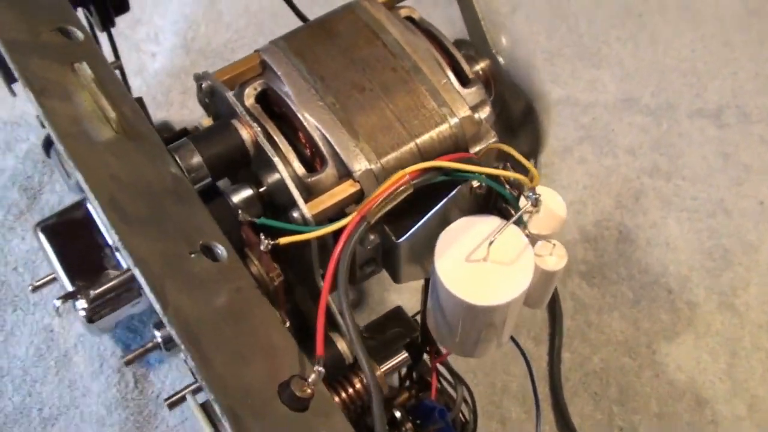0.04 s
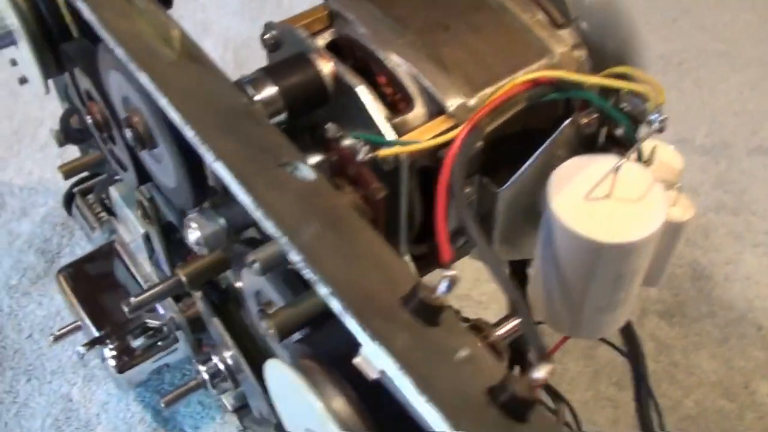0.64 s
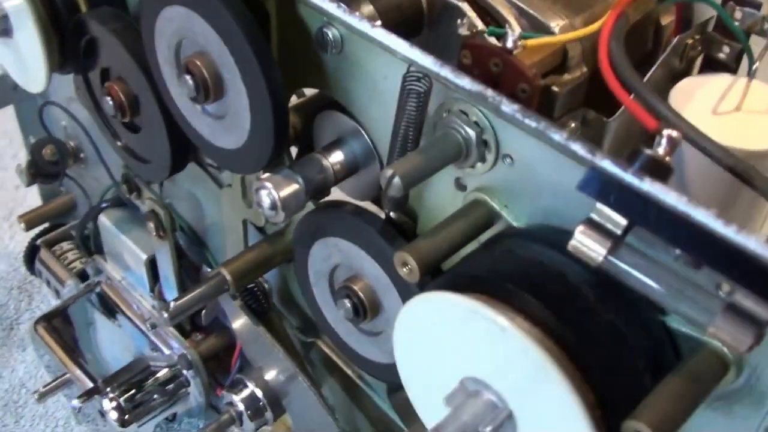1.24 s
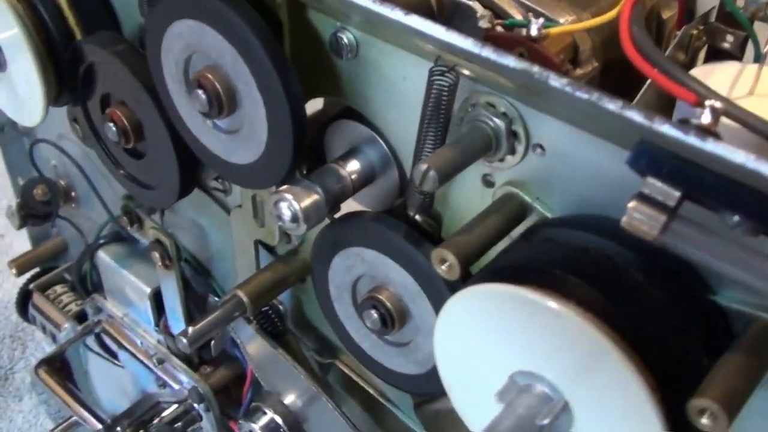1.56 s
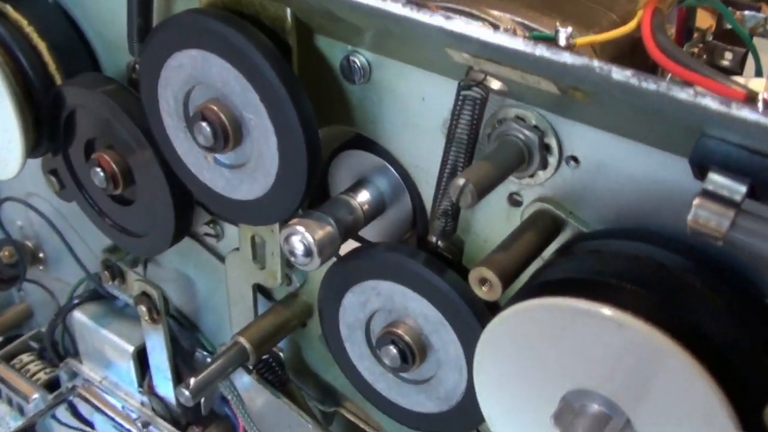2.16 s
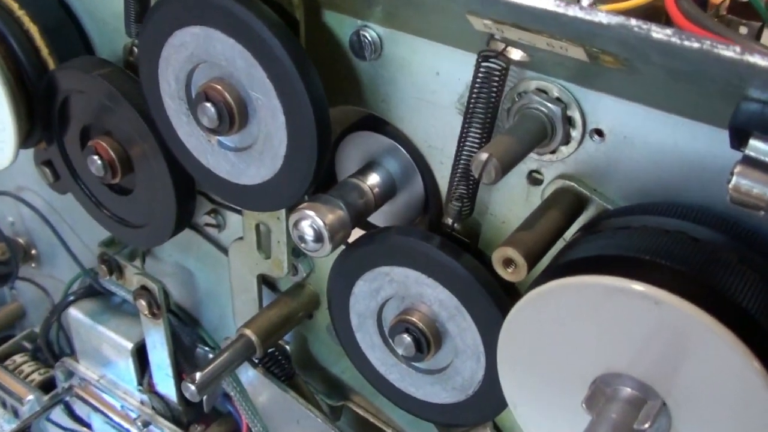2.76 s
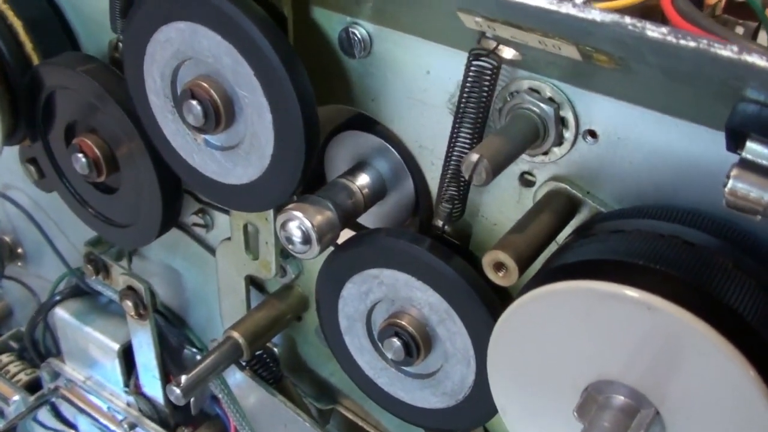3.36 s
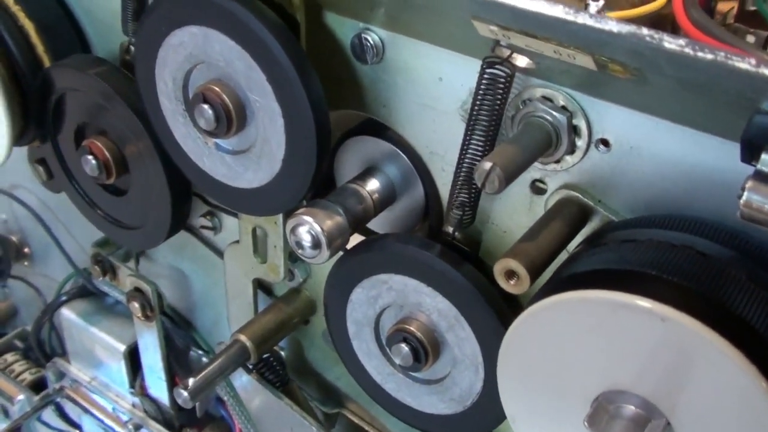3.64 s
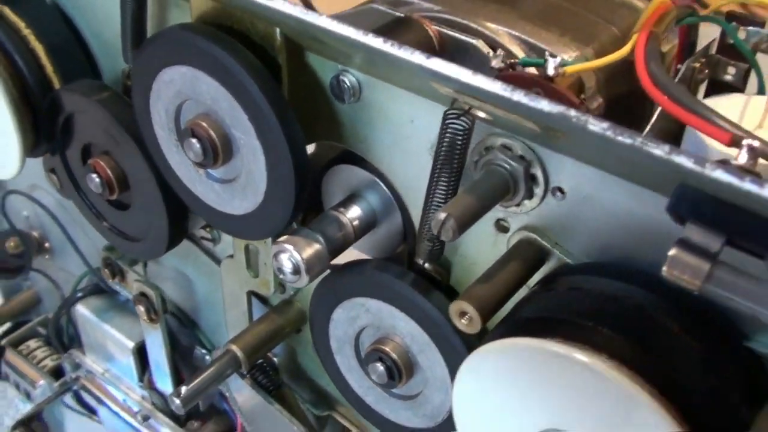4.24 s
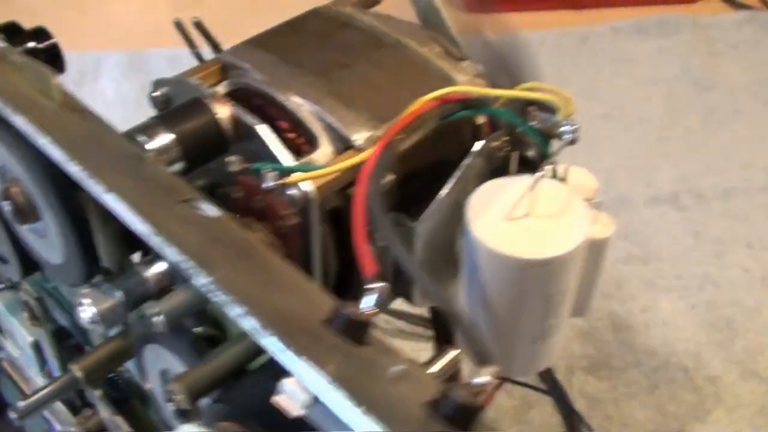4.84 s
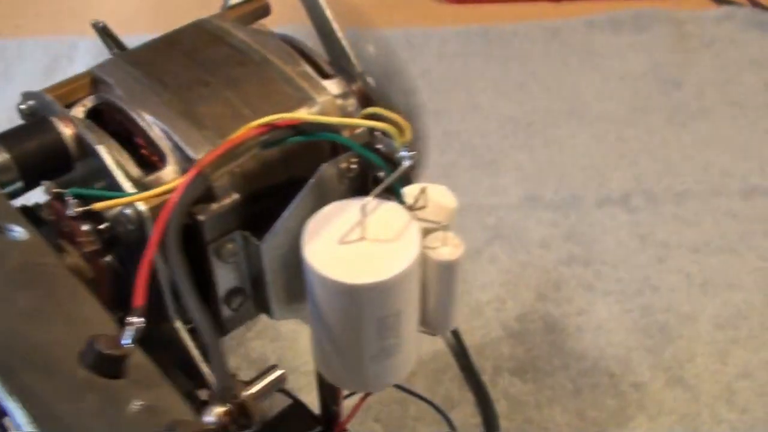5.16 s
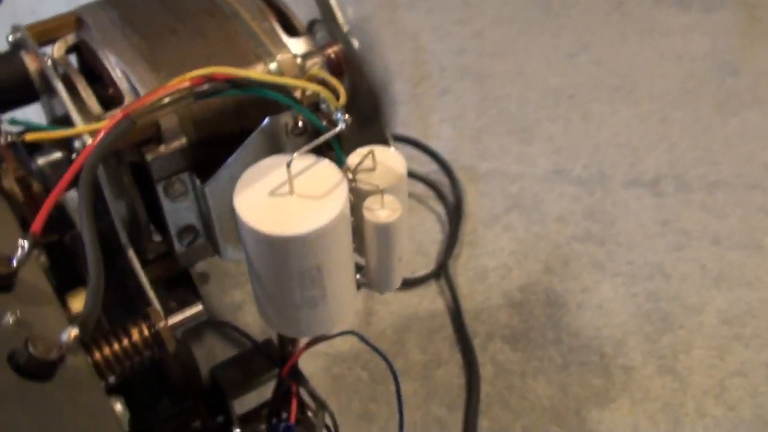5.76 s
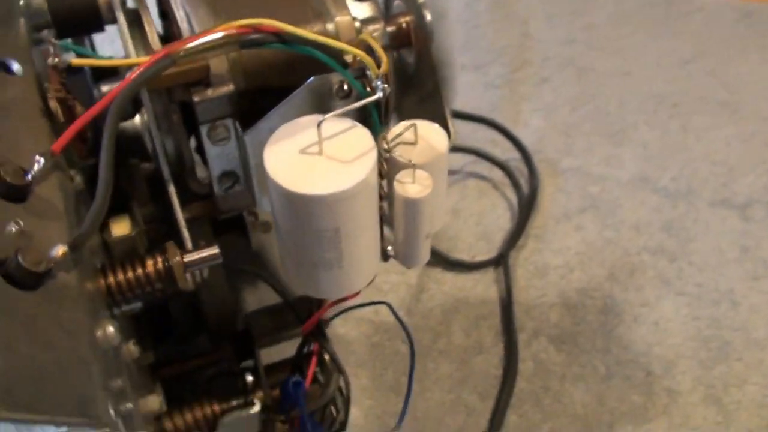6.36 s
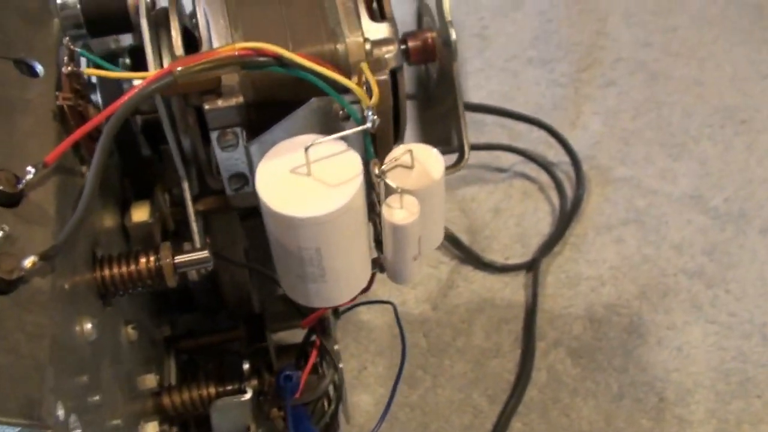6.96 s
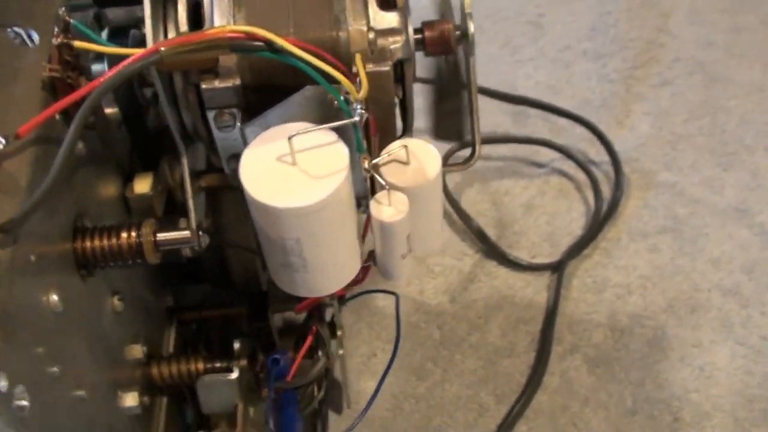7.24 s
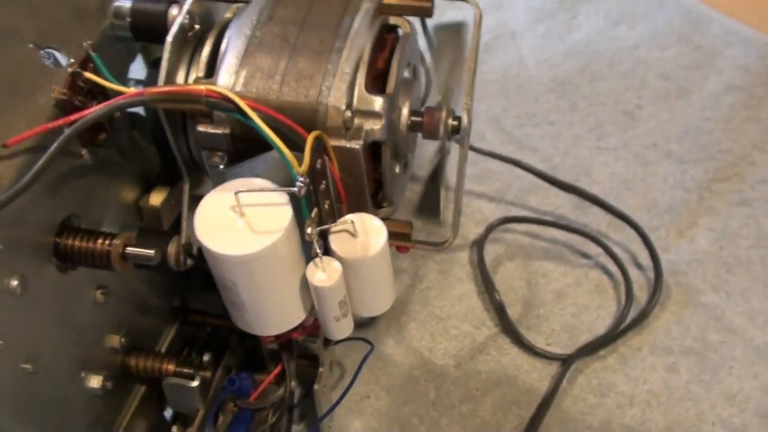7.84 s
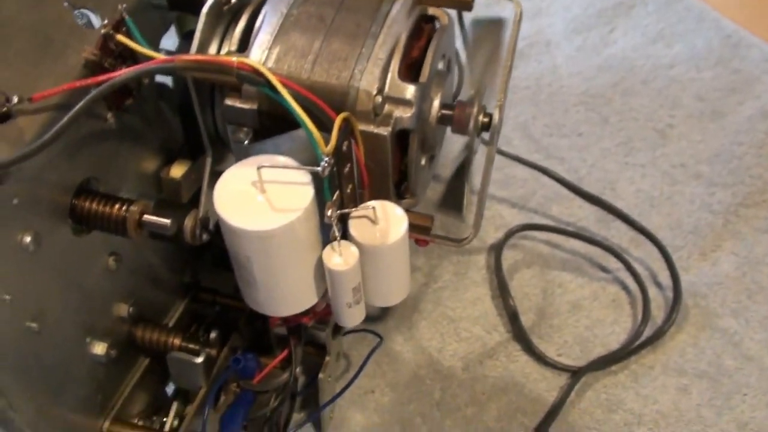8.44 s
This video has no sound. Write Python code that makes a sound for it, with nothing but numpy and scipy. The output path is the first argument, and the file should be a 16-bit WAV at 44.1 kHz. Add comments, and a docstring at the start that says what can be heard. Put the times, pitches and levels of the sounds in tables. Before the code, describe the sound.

A small electric motor hums steadily with a slight throb and soft hiss, with one light knock and a few faint ticks.

```python
"""An opened tape deck runs on a workbench under a hand-held camera. From the start its induction motor
hums at twice the mains rate and throbs with the wheels, over a rush of fan and rubber rims, hiss and thin
whines; all swell and settle. Near 1 s the camera's case is knocked in the hand; sparse ticks fall in the
first 6 s. From 2 to 4 s the camera is over the wheels, where the chassis shades the hiss. Cloth, faint
at first, rustles most from 6 s on."""
import sys
import numpy as np
from scipy import signal
from scipy.fft import rfft, irfft, next_fast_len
from scipy.io import wavfile

SR = 44100
rng = np.random.default_rng(int(sys.argv[2]) if len(sys.argv) > 2 else 0)


def put_to_file(sound):
    """Save the sound as 16-bit audio at rate SR, in the file named by the first command-line argument."""
    columns = np.atleast_2d(sound).T  # one column per channel
    safe = np.clip(columns, -1, 1)
    whole_steps = np.round(safe * 32767)
    wavfile.write(sys.argv[1], SR, whole_steps.astype(np.int16))


N = 383229
TIME_S = np.arange(N) / SR
RING_TIME_S = np.arange(SR // 4) / SR


# Hum overtones. Each row: multiple of the hum, level in dB re the hum, left minus right in dB.
HUM_OVERTONES = [(2, -36.5, 11), (3, -38, 0), (6, -45, -8.5), (8, -49.5, -1), (12, -54, 2),
                 (24, -54.5, -15)]
# Swell as the camera moves. Each row: time in seconds, gain of harmonic 2 in dB, of harmonic 3 in dB.
HARMONIC_SWELL = [(0, -6.5, 1), (1.55, 3.5, -8), (2.25, -2, 2), (3.05, 6, 0), (4.1, 1, -1), (4.9, 2.5, 3.5),
                  (6.2, 5.5, 6), (6.6, -5, 0), (7, 4, 3), (7.8, -17, 4), (8.4, 0, 2)]

def motor_hum(hum_hz=119.963, wheel_hz=5.9875, first_throb_s=0.017, pan_settle_s=3.2, waver=0.14):
    """The stator iron hums; the wheels load it once and twice a turn, shaking level and phase."""
    wheel_rad = 2 * np.pi * wheel_hz * (TIME_S - first_throb_s)
    hum_rad = 2 * np.pi * hum_hz * TIME_S + 0.065 * np.sin(2 * wheel_rad) - 0.069 * np.sin(wheel_rad)
    load = 1 + 0.053 * np.cos(2 * wheel_rad) + 0.017 * np.cos(wheel_rad)
    out = np.sin(hum_rad) * pan(-3.5 + 3 * np.exp(-TIME_S / pan_settle_s))  # drifts to the right
    times_s, second_db, third_db = np.transpose(HARMONIC_SWELL)
    swell_db = {2: np.interp(TIME_S, times_s, second_db), 3: np.interp(TIME_S, times_s, third_db)}
    for multiple, db, pan_db in HUM_OVERTONES:
        # overtones waver as the camera moves through their pattern in the room
        tone = np.sin(multiple * hum_rad + waver * drift(0.39) + rng.uniform(0, 2 * np.pi))
        tone *= 1 + waver * drift(0.96)
        out += amp(db + swell_db.get(multiple, 0)) * pan(pan_db) * tone
    return np.sqrt(2) * amp(running_db(base_db=-28.5, swell_db=9, over_wheels_db=1)) * load * out


# Rush spectrum. Each row: frequency in Hz, relative density in dB.
RUSH_SPECTRUM = [(20, -12), (42, -18), (66, -5.5), (95, -2.5), (170, 0.5), (330, -1), (550, -3.5),
                 (900, -8), (1500, -14), (2300, -19.5), (5000, -27), (15000, -35.5)]

def fan_and_rims(flutter_db=0.7):
    """Fan draught and rolling rubber rims make a soft, low rush."""
    rush = stereo_noise(RUSH_SPECTRUM)
    return rush * amp(running_db(base_db=-44, swell_db=12, over_wheels_db=-0.33) + flutter_db * drift(29))


# Case modes. Each row: frequency in Hz, relative level in dB, free t60 in seconds,
# left minus right in dB, polarity of right against left.
CASE_MODES = [(323, -4.5, 0.071, -2, 1), (593, -17, 0.024, 4, -1), (750, 3.5, 0.016, 4, -1),
              (945, -5, 0.021, 10, 1), (1230, -7.5, 0.042, 12, 1), (1454, -9, 0.034, -2, 1),
              (1620, -8, 0.026, -7, 1), (1830, -13, 0.029, -16, 1), (2210, -19, 0.02, -13, 1),
              (2830, -19.5, 0.013, -14, 1), (3600, -14.5, 0.013, 1, 1), (5050, -19, 0.0075, -6, 1),
              (6800, -19.5, 0.01, -3, 1)]

def case_ring(t60_share):
    """The camera's plastic case rings in decaying modes, cut short by the grip."""
    out = np.zeros((2, len(RING_TIME_S)))
    for hz, db, t60_s, pan_db, polarity in CASE_MODES:
        decay = amp(db - 60 * RING_TIME_S / (t60_s * t60_share))
        sides = pan(pan_db) * np.array([[1], [polarity]])
        out += sides * decay * np.sin(2 * np.pi * hz * RING_TIME_S)
    return out


# Blows on the case. Each row: start in seconds, gain in dB, low-pass in Hz, high-pass in Hz,
# left minus right in dB, share of t60 left by the grip.
CASE_BLOWS = [(1.0048, -26.5, 7000, 645, 0, 1), (1.0395, -46, 9000, 1200, 0, 0.44),
              (1.3578, -33, 2200, 170, -1, 0.66), (1.366, -36, 600, 300, 5, 0.49)]

def case_knocks(room_db=-23):
    """Short blows ring the case; a resting finger makes them dry."""
    out = np.zeros((2, N))
    for start_s, db, lowpass_hz, highpass_hz, pan_db, t60_share in CASE_BLOWS:
        blow = signal.sosfilt(signal.butter(1, lowpass_hz, fs=SR, output="sos"), case_ring(t60_share))
        blow = signal.sosfilt(signal.butter(4, highpass_hz, "high", fs=SR, output="sos"), blow)
        add(out, start_s, amp(db) * pan(pan_db) * (blow + amp(room_db) * room(blow.mean(0))))
    return out


# Small ticks. Each row: start in seconds, gain in dB, centre in Hz, width in octaves.
TICK_EVENTS = [(.292, -60, 8900, .4), (0.5741, -36.5, 2400, 1.3), (1.0392, -51, 4970, 0.37),
               (1.2505, -54, 7500, .5), (2.213, -49.5, 8450, 0.97), (2.218, -48.5, 7100, 0.37),
               (2.2252, -60, 7600, .3), (5.047, -54, 7500, .6), (5.8481, -41, 1870, 1.2)]

def ticks(t60_s=0.0089, scratch_gain=0.38):
    """Tiny snaps: a pulse and a brief scratch through one broad resonance, plus room scatter."""
    out = np.zeros((2, N))
    decay = amp(-60 * RING_TIME_S / t60_s)
    decay_rms = np.sqrt(np.mean(decay ** 2))
    for start_s, db, centre_hz, octaves in TICK_EVENTS:
        edges_hz = centre_hz * 2 ** (np.array([-0.5, 0.5]) * octaves)
        band = signal.butter(2, edges_hz, "band", fs=SR, output="sos")
        snap = unit_rms(signal.sosfilt(band, signal.unit_impulse(len(decay))))
        scratch = unit_rms(signal.sosfilt(band, rng.standard_normal(len(decay)) * decay))
        room_db = -0.5 - 0.5 * np.log2(centre_hz / 2500)  # the room returns less of a higher tick
        tick = snap + scratch_gain * scratch + amp(room_db) * room(snap)
        add(out, start_s, amp(db) * decay_rms * tick)
    return out


# Cloth spectrum. Each row: frequency in Hz, relative density in dB.
CLOTH_SPECTRUM = [(300, -18), (900, 11.5), (1900, 7.5), (3200, 4.5), (5000, 0.5), (7200, -0.5),
                  (9000, -4.5), (12000, -11), (15700, -20)]
# Cloth strokes. Each row: middle in seconds, half-length in seconds, relative level in dB.
CLOTH_STROKES = [(0.122, 0.14, -61), (1.258, 0.042, -68), (1.38, 0.6, -64.5), (4.42, 0.51, -66),
                 (5.048, .04, -65), (5.27, 0.13, -65), (5.38, 0.24, -61.5), (5.862, 0.1, -56.5),
                 (5.97, 0.17, -56), (6.192, 0.16, -57.5), (6.283, 0.11, -55.5), (6.36, .12, -60),
                 (6.58, .16, -67), (6.925, 0.24, -54), (7.11, 0.24, -57), (7.625, 0.26, -64),
                 (7.97, 0.47, -59.5), (8.088, 0.14, -64)]

def cloth_rustle(grain_db=2, grain_hz=120, plain_stroke_db=-57.5, trim_db=-1):
    """Fabric fibres catch and slip in grainy strokes; firmer strokes are duller."""
    fibres = stereo_noise(CLOTH_SPECTRUM) * amp(grain_db * drift(grain_hz))
    out = np.zeros((2, N))
    for middle_s, half_s, db in CLOTH_STROKES:
        span = np.flatnonzero(abs(TIME_S - middle_s) < half_s)
        octave = np.log2(np.clip(np.fft.rfftfreq(len(span), 1 / SR), 500, 8000))
        tilt_db_per_octave = 0.45 * (plain_stroke_db - db)
        tilt = unit_rms(amp(tilt_db_per_octave * octave))
        stroke = unit_rms(irfft(rfft(fibres[:, span]) * tilt, len(span)))
        envelope = np.cos(np.pi * (TIME_S[span] - middle_s) / half_s / 2) ** 4
        out[:, span] += amp(db + trim_db) * envelope * stroke
    return out


# Hiss spectrum. Each row: frequency in Hz, relative density in dB.
HISS_SPECTRUM = [(200, -7), (1200, 7.5), (3000, 3.5), (5000, -1), (7500, -2.5), (10500, -6.5),
                 (13000, -12.5), (15700, -25.5)]

def hiss(flutter_db=1.05):
    """Treble hiss, strongest by the motor; the chassis plate shades it over the wheels."""
    noise = stereo_noise(HISS_SPECTRUM)
    return noise * amp(running_db(base_db=-57.5, swell_db=5, over_wheels_db=-9.5) + flutter_db * drift(10))


# Electronic whines. Each row: frequency in Hz, relative level in dB, rms waver as a share of amplitude.
WHINE_TONES = [(7853, -24, .4), (7882, -23.3, .4), (8638, -32, .3), (12252.4, -25, .2), (12353, -34, .15),
               (13257, -33.5, .15)]

def whines(waver_hz=7.1):
    """Thin electronic tones of steady pitch and wavering level."""
    tones = sum(amp(db) * np.sin(2 * np.pi * hz * TIME_S) * (1 + waver * drift(waver_hz))
                for hz, db, waver in WHINE_TONES)
    return np.sqrt(2) * amp(running_db(base_db=-59.8, swell_db=8.5, over_wheels_db=-1.5)) * tones


# Camera path. Each row: time in seconds, position from 0 (over the motor) to 1 (over the wheels).
CAMERA_PATH = [(0, 0.047), (2.2, 0.88), (3.9, 1), (5.1, 0.54), (6.1, 0.055), (8.69, 0.41)]

def running_db(base_db, swell_db, over_wheels_db, settle_s=5.9):
    """Level of a running sound: swells towards base_db, offset by the camera's position."""
    position = np.interp(TIME_S, *np.transpose(CAMERA_PATH))
    return base_db - swell_db * np.exp(-TIME_S / settle_s) + over_wheels_db * position


# Likeness of the channels. Each row: frequency in Hz, correlation from -1 to 1.
NOISE_CORRELATION = [(30, 0.61), (70, 0.53), (150, -0.12), (280, -0.047), (550, -0.16), (1000, -0.034),
                     (2000, 0.094), (4000, 0.21), (8000, 0.53), (14000, 0.48)]
# Noise balance. Each row: frequency in Hz, left minus right in dB.
NOISE_PAN = [(60, 11), (250, -1), (550, 1.5), (1200, 1), (2500, 0.5), (14000, .5)]

def stereo_noise(spectrum):
    """Coloured noise of rms 1 at two closely spaced microphones."""
    size = next_fast_len(N)
    hz = np.fft.rfftfreq(size, 1 / SR)
    left, independent = rfft(rng.standard_normal((2, size)))
    correlation = at_hz(NOISE_CORRELATION, hz)
    right = correlation * left + np.sqrt(1 - correlation ** 2) * independent
    colour = pan(at_hz(NOISE_PAN, hz)) * amp(at_hz(spectrum, hz))
    return unit_rms(irfft(np.array([left, right]) * colour, size)[:, :N])


def room(x, t60_s=0.13, gap_s=0.0028, build_s=0.0026):
    """Short stereo scatter off bench and walls, building up after a gap."""
    onset = np.clip((RING_TIME_S - gap_s) / build_s, 0, 1)
    tail = rng.standard_normal((2, len(onset))) * amp(-60 * RING_TIME_S / t60_s) * onset
    return signal.fftconvolve(x[None], tail / np.linalg.norm(tail[0]), axes=1)[:, :len(x)]


def drift(rate_hz):
    """Random motion of rms 1, mostly below rate_hz."""
    hz = np.fft.rfftfreq(N, 1 / SR)
    return unit_rms(irfft(rfft(rng.standard_normal(N)) / (1 + (hz / rate_hz) ** 4), N))


def at_hz(table, hz):
    """Interpolates a table over log frequency."""
    table_hz, values = np.transpose(table)
    return np.interp(np.log(hz + 1), np.log(table_hz + 1), values)


def amp(db):
    """Decibels to gain."""
    return 10 ** (np.asarray(db) / 20)


def pan(pan_db):
    """Stereo gains for left minus right in dB."""
    return amp(np.array([[0.5], [-0.5]]) * pan_db)


def unit_rms(x):
    """Scales to rms 1."""
    return x / np.sqrt(np.mean(x ** 2) + 1e-20)


def add(mix, start_s, sound):
    """Mixes in a stereo sound at start_s."""
    part = mix[:, round(start_s * SR):][:, :sound.shape[1]]
    part += sound[:, :part.shape[1]]


def scene():
    """The running deck and the handling noises, in stereo."""
    return motor_hum() + fan_and_rims() + hiss() + cloth_rustle() + case_knocks() + ticks() + whines()


def record(dry, cutoff_hz=15720):
    """Steep low-pass band limit."""
    low_pass = signal.firwin(1023, cutoff_hz, window=("kaiser", 9), fs=SR)
    return signal.oaconvolve(dry, low_pass[None], "same")


dry = scene()
out = record(dry)
put_to_file(out)
```